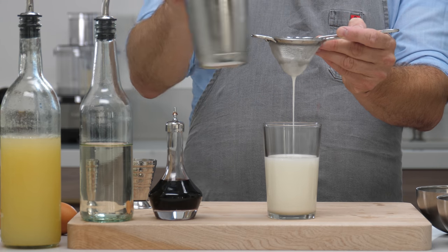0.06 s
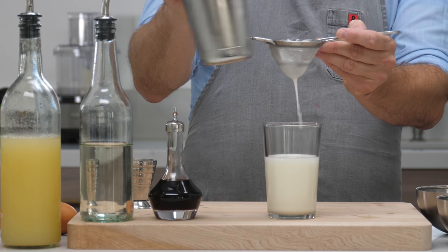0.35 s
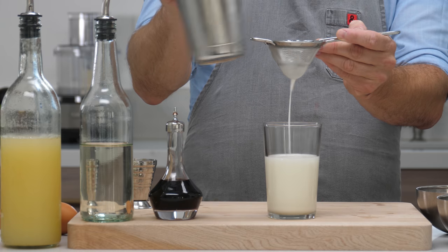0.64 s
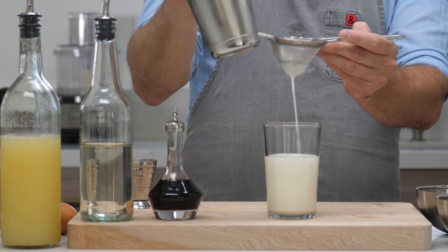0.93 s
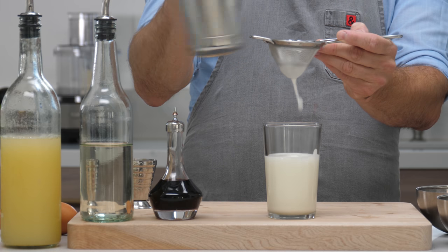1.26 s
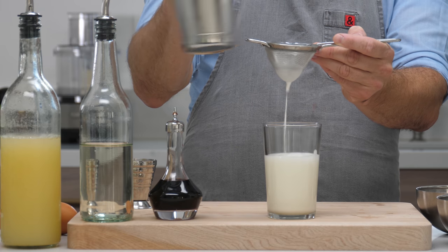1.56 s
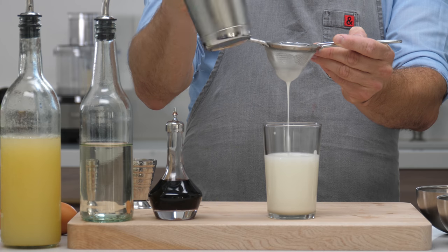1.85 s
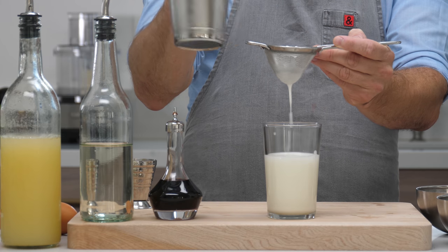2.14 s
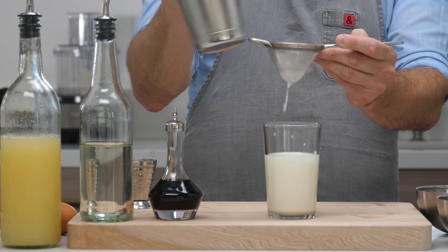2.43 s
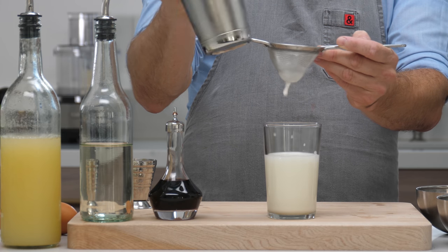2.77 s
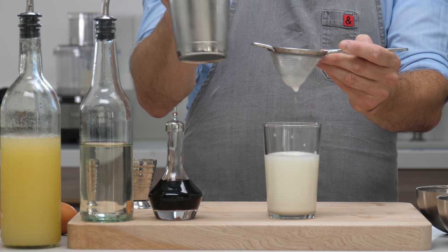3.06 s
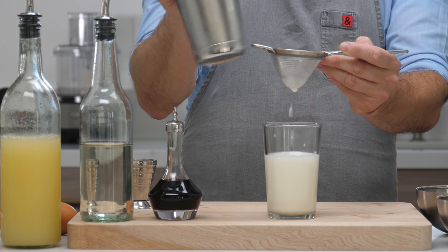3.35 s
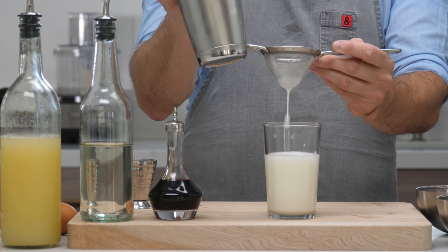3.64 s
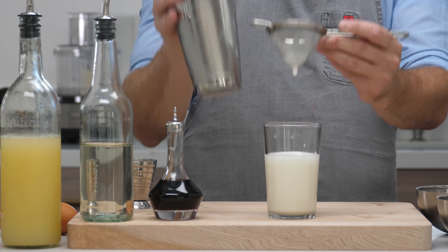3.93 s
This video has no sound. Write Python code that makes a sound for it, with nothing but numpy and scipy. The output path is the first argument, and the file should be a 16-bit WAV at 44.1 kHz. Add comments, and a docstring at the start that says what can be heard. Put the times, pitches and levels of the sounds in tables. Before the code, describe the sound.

A steel shaker tin taps against a metal strainer about five times a second, each tap a hollow, ringing clank. For the first second the taps clink brightly and ice tumbles inside, with lighter knocks around 1.5 seconds. After 2 seconds the ice settles and the rim rings out. The cubes knock again from 3.1 to 3.5 seconds, then the taps fade by 4 seconds in a quiet, slightly echoing kitchen.

```python
"""A steel shaker tin is tapped on the rim of a fine strainer about five times a second to drain a drink.
Each tap is a clash of thin steel, a hollow note from the air in the tin, a ring of tin and rim and a thump.
At first the taps also clink brightly, and ice knocks and tumbles inside the tin between them.
Around two seconds the ice settles and the rim sings out; just after three the cubes knock again.
The last taps fade away. A kitchen rings around it all, over a quiet background."""
import sys
import numpy as np
from scipy import signal
from scipy.fft import rfft, irfft
from scipy.io import wavfile

SR = 44100
rng = np.random.default_rng(int(sys.argv[2]) if len(sys.argv) > 2 else 0)


def generate_wav(sig):
    """Save sig (samples, or channels by samples) to the path in sys.argv[1] as 16-bit PCM at SR."""
    pcm = np.round(np.clip(np.atleast_2d(sig).T, -1, 1) * 32767).astype(np.int16)
    wavfile.write(sys.argv[1], SR, pcm)


N = 176400
AGE = np.arange(int(.5 * SR)) / SR   # seconds since a blow

# modes of the tin's steel wall: pitch_hz, level_db
TIN_MODES = [(1308, -4.5), (1451, -4.5), (1828, 2.5), (2815, -6.5), (2907, -0.5), (3049, -8.5), (3239, -11)]
# modes of the steel's bright clink: pitch_hz, level_db
CLINK_MODES = [(2900, -10), (4540, -16), (5330, -16)]
TIN_T60_S, CLINK_T60_S = .15, .19
# dull body of an ice hit: frequency_hz, density_db
KNOCK_SPECTRUM = [(480, 4.5), (1900, -2)]
# bright edge of an ice hit: frequency_hz, density_db
CRACK_SPECTRUM = [(2800, 4), (3800, 1), (5000, 0), (6400, -6.5), (7700, 0.5), (8700, -5.5), (16000, -6.5)]


def from_db(db):
    """Decibels to gain."""
    return 10 ** (np.asarray(db) / 20)


def at_hz(points, hz):
    """Reads a table on a log-frequency axis."""
    frequencies, values = np.transpose(points)
    return np.interp(np.log(hz + 1e-3), np.log(frequencies), values)


def wobble(axis, step, spread_db):
    """A gain that glides to a new random value at every step along an axis."""
    knots = np.arange(0, axis[-1] + step, step)
    return from_db(spread_db * np.interp(axis, knots, rng.standard_normal(len(knots))))


def decay(t60_s, age):
    """Falls by 60 dB in t60_s."""
    return np.exp(-np.log(1000) * age / t60_s)


def unit_blow(x, onset_s=.014):
    """Scales a hit to rms 1 over its onset."""
    return x / np.sqrt(np.mean(x[:int(onset_s * SR)] ** 2))


def add(out, start_s, sound):
    """Mixes a sound in at start_s."""
    i = int(start_s * SR)
    part = sound[max(-i, 0):max(N - i, 0)]
    out[max(i, 0):max(i, 0) + len(part)] += part


def noise(spectrum, size, ripple_hz=220):
    """Noise of rms 1, coloured a little differently each time, falling steeply past its table's ends."""
    hz = np.fft.rfftfreq(size, 1 / SR) + 1e-3
    skirts = np.minimum(1, hz / spectrum[0][0]) ** 2 * np.minimum(1, spectrum[-1][0] / hz) ** 2
    colour = from_db(at_hz(spectrum, hz)) * wobble(hz, ripple_hz, spread_db=2.5)
    x = irfft(rfft(rng.standard_normal(size)) * colour * skirts, size)
    return x / x.std()


def room_tone(level_db=-63.5):
    """The kitchen's quiet bed of dark noise."""
    return from_db(level_db) * noise([(60, 1), (16000, -31)], N)


def kitchen_reverb(x, delay_s=.012, build_s=.016):
    """A diffuse tail builds up after a short delay and dies soonest in the high treble."""
    # tone of the tail: frequency_hz, level_db
    tail_colour = [(170, -17), (260, -10.5), (900, -7), (1400, -6)]
    # length of the tail: frequency_hz, t60_s
    tail_t60 = [(250, 0.44), (3000, 0.57), (15000, 0.35)]
    age, tail = np.arange(int(.7 * SR)) / SR, 0
    edges_hz = np.geomspace(45, 17000, 18)
    build = np.clip((age - delay_s) / build_s, 0, 1)
    for low, high in zip(edges_hz, edges_hz[1:]):
        hz = np.sqrt(low * high)
        bandpass = signal.butter(3, [low, high], "band", fs=SR, output="sos")
        band = signal.sosfilt(bandpass, rng.standard_normal(len(age)))
        band = band * build * decay(at_hz(tail_t60, hz), age)
        unity_gain = np.sqrt(2 * (high - low) / SR / np.sum(band ** 2))
        tail = tail + from_db(at_hz(tail_colour, hz)) * band * unity_gain
    return signal.fftconvolve(x, tail)[:N]


def contact_burst(spectrum, t60_s, ramp_s=.12, hold_s=0, chatter_per_s=500):
    """Dense, short-lived modes flicker as surfaces chatter; a ramp longer than the decay softens the hit."""
    envelope = np.minimum(AGE / ramp_s, 1) * decay(t60_s, np.maximum(AGE - hold_s, 0))
    burst = noise(spectrum, len(AGE)) * envelope
    return unit_blow(burst * wobble(AGE, 1 / chatter_per_s, spread_db=3))


def steel_ring(modes, t60_s, spread_db=3, detune=.0045):
    """Grip and ice split each steel mode into a beating pair, struck differently at every blow."""
    out = np.zeros(len(AGE))
    for hz, db in modes:
        for sign, strength, split in rng.standard_normal((2, 3)):
            partial = np.sin(2 * np.pi * hz * (1 + detune * split) * AGE)
            out += np.sign(sign) * from_db(db + spread_db * strength) * partial
    return out * decay(t60_s, AGE)


def hollow_note(pitch_hz=451.4, wander=.018, rise_s=.0029, t60_s=.094):
    """The air in the tin swells for a cycle and rings, its pitch shifting a little with the ice."""
    hz = pitch_hz * (1 + wander * rng.uniform(-1.36, 1))
    note = np.sin(2 * np.pi * hz * AGE) * decay(t60_s, AGE)
    return unit_blow(note * (1 - np.exp(-AGE / rise_s)))


def ice_chips(chips_per_s=60, spread_db=2.5, t60_s=.032):
    """Small pieces of ice tumble in the tin, each a tiny knock, crack and hollow note."""
    # spells of tumbling: start_s, end_s, level_db
    tumbles = [(.01, .06, -34.5), (.44, .78, -37.5), (1.43, 1.87, -51)]
    out = np.zeros(N)
    for start_s, end_s, level_db in tumbles:
        for slot_s in np.arange(start_s, end_s, 1 / chips_per_s):
            knock = contact_burst(KNOCK_SPECTRUM, t60_s)
            crack = from_db(-4) * contact_burst(CRACK_SPECTRUM, t60_s)
            chip = knock + crack + from_db(-3) * hollow_note()
            hit_s = slot_s + rng.random() / chips_per_s
            add(out, hit_s, from_db(level_db + spread_db * rng.uniform(-.66, 1)) * chip)
    return out


def ice_cubes():
    """Cubes fall against the wall: a dull knock, the hollow note, and a crack that rings the steel."""
    # cube hits: start_s, knock_db, hollow_db, crack_db
    hits = [(0.069, -27.5, -49, -33.5), (0.126, -33.5, -30.5, -27.5), (0.19, -33, -34.5, -30),
            (0.263, -30.5, -30.5, -29.5), (0.3487, -24.5, -23, -30), (0.474, -28, -49, -30),
            (0.492, -29.5, -29.5, -24), (0.5244, -32, -32, -30), (0.5438, -29, -53, -29.5),
            (0.571, -30, -32, -50), (0.63, -30, -29, -28.5), (0.715, -27.5, -29, -24),
            (0.784, -34.5, -32.5, -43), (0.852, -31, -29.5, -40), (0.9028, -32, -28, -35.5),
            (1.3964, -36, -38, -52), (1.458, -37, -33.5, -31.5), (1.487, -32.5, -33.5, -37),
            (1.578, -36, -39, -51), (1.668, -34, -30, -52), (2.2266, -37, -34, -60),
            (2.3095, -33, -37, -53), (3.102, -27, -28, -31.5), (3.125, -30.5, -27, -54),
            (3.2115, -28, -15.5, -32), (3.284, -25, -45, -24), (3.34, -33, -27, -34.5),
            (3.441, -28, -28, -29), (3.462, -47, -22, -39)]
    out = np.zeros(N)
    for start_s, knock_db, hollow_db, crack_db in hits:
        crack = from_db(-2.5) * contact_burst(CRACK_SPECTRUM, t60_s=.05)
        crack += from_db(-10) * steel_ring(TIN_MODES, TIN_T60_S)
        crack += from_db(-3) * steel_ring(CLINK_MODES, CLINK_T60_S)
        knock = from_db(-.5) * contact_burst(KNOCK_SPECTRUM, t60_s=.0184, ramp_s=.0007, hold_s=.002)
        air = from_db(hollow_db) * hollow_note()
        add(out, start_s, from_db(knock_db) * knock + air + from_db(crack_db) * crack)
    return out


def tin_taps(rim_t60_s=.19, clink_until_s=1.3, thump_fade_db_per_s=1):
    """The tin hits the strainer's rim: both ring, and the jolt gives a splash of treble and a thump."""
    # taps on the strainer: start_s, clash_db, hollow_db, jolt_db, rim_db
    taps = [(-0.02, -18, -20.5, -37, -27), (0.152, -25, -26, -25, -56), (0.3055, -26, -31, -28, -54),
            (0.688, -20.5, -31, -26, -45), (0.8624, -21, -26.5, -28.5, -54),
            (1.0411, -22.5, -25.5, -24.5, -46), (1.221, -22, -23.5, -27, -53),
            (1.416, -16.5, -22.5, -25, -29), (1.598, -18.5, -25.8, -29, -47),
            (1.7843, -24.5, -28.0, -33, -40), (1.955, -24, -32, -34.5, -53),
            (2.1333, -21, -24.5, -30.5, -38), (2.3208, -21, -20, -27.5, -21.5),
            (2.49, -18.5, -29.5, -30, -50), (2.6664, -21.5, -25, -27.5, -21.5),
            (2.841, -19.5, -25, -30, -40), (3.055, -19, -20.5, -27.5, -32.5),
            (3.239, -18, -15.5, -25.5, -24.5), (3.4023, -21, -21.5, -25, -31),
            (3.56, -26, -22, -31.5, -38.5), (3.711, -35.0, -36, -39, -61), (3.884, -38, -35.5, -67, -70)]
    # midrange clash of thin steel: frequency_hz, density_db
    clash_spectrum = [(300, -11), (620, -0.5), (1050, -6), (1800, 3.5), (2600, -5.5), (3000, 6),
                      (3800, -11.5)]
    # bright top of the jolt: frequency_hz, density_db
    treble_spectrum = [(4300, 2.5), (5300, 1.5), (5750, -4), (7200, 1), (8600, -9), (10000, -3.5),
                       (12000, -9), (13100, -4.5), (15500, -13)]
    # low end of the jolt: frequency_hz, density_db
    thump_spectrum = [(45, 2), (270, -8)]
    # main ring of the rim: pitch_hz, level_db
    rim_modes = [(3588, -1), (5970, -15.5)]
    # thin upper ring of the rim: pitch_hz, level_db
    upper_modes = [(9096, -0.89)]
    # level ride of that upper ring: time_s, level_db
    upper_levels = [(1.42, -52), (1.6, -41), (3.05, -41), (3.9, -82)]
    out = np.zeros(N)
    for start_s, clash_db, hollow_db, jolt_db, rim_db in taps:
        clash = from_db(-2.5) * contact_burst(clash_spectrum, t60_s=.1136, ramp_s=.002, hold_s=.0117)
        clash += from_db(-11.5) * steel_ring(TIN_MODES, TIN_T60_S)
        jolt = contact_burst(treble_spectrum, t60_s=.084, ramp_s=.001, hold_s=.0043)
        thump = contact_burst(thump_spectrum, t60_s=.045, ramp_s=.0028, hold_s=.0061)
        jolt += from_db(-7.486 - thump_fade_db_per_s * start_s) * thump   # taps land ever more lightly
        jolt += (start_s < clink_until_s) * steel_ring(CLINK_MODES, CLINK_T60_S)
        upper_db = np.interp(start_s, *np.transpose(upper_levels))
        rim = from_db(rim_db) * steel_ring(rim_modes, rim_t60_s)
        rim += from_db(upper_db) * steel_ring(upper_modes, rim_t60_s)
        air = from_db(hollow_db) * hollow_note()
        add(out, start_s, from_db(clash_db) * clash + from_db(jolt_db) * jolt + air + rim)
    return out


def scene():
    """Taps and ice in the kitchen, over its room tone, in mono."""
    shaker = tin_taps() + ice_cubes() + ice_chips()
    return (shaker + kitchen_reverb(shaker) + room_tone())[None]


def record(dry, cutoff_hz=15850):
    """A steep low-pass takes off the very top."""
    return signal.sosfilt(signal.ellip(12, .1, 80, cutoff_hz, fs=SR, output="sos"), dry)


dry = scene()
out = record(dry)
generate_wav(out)
```